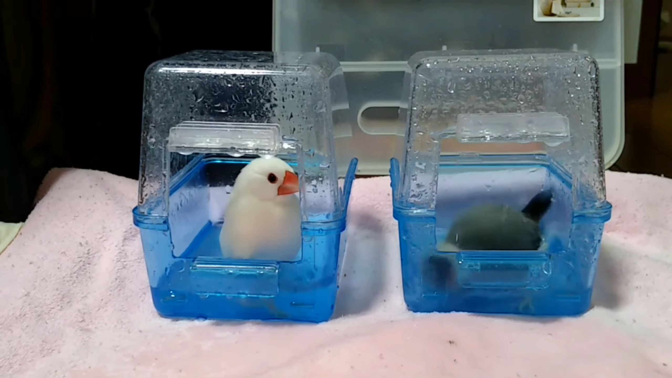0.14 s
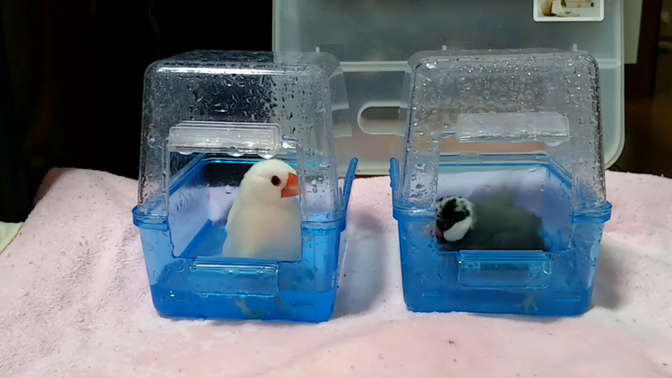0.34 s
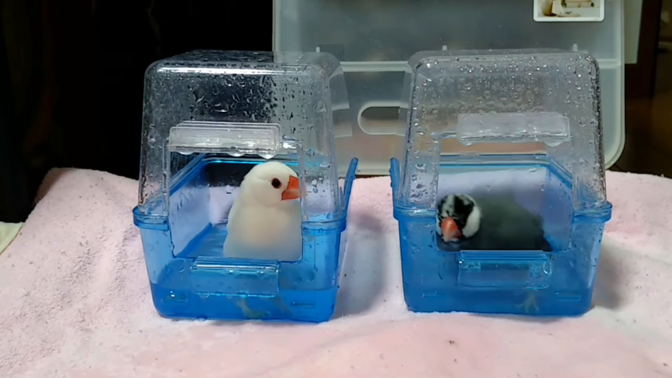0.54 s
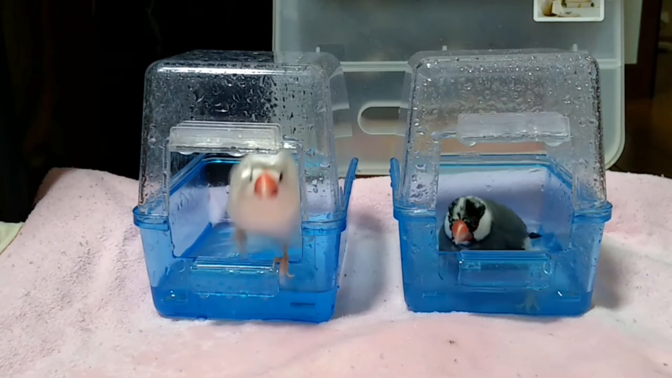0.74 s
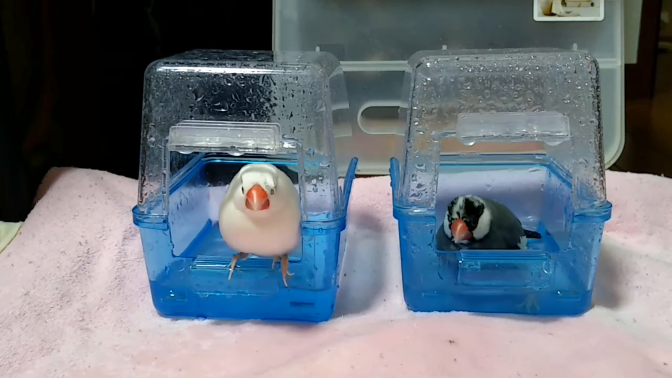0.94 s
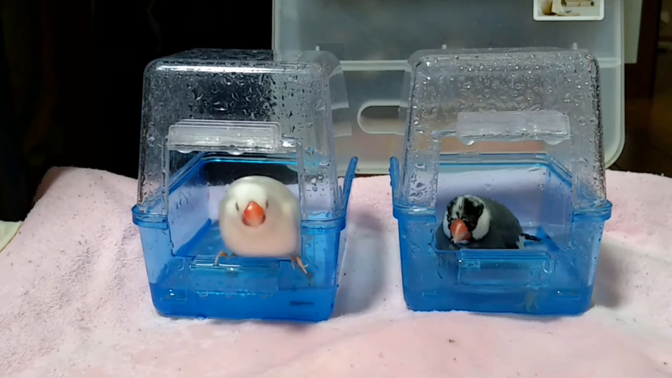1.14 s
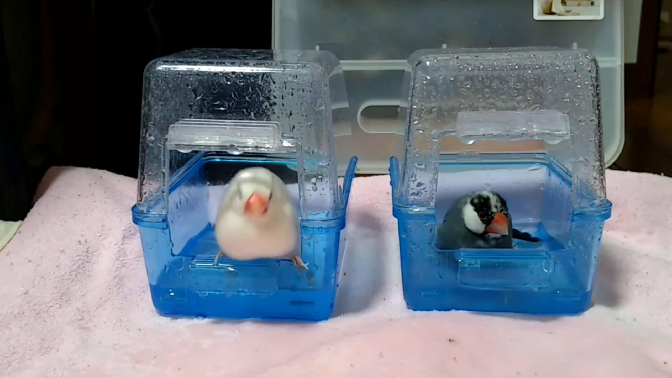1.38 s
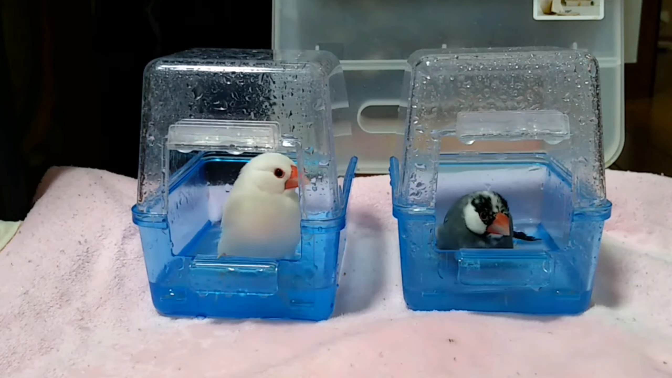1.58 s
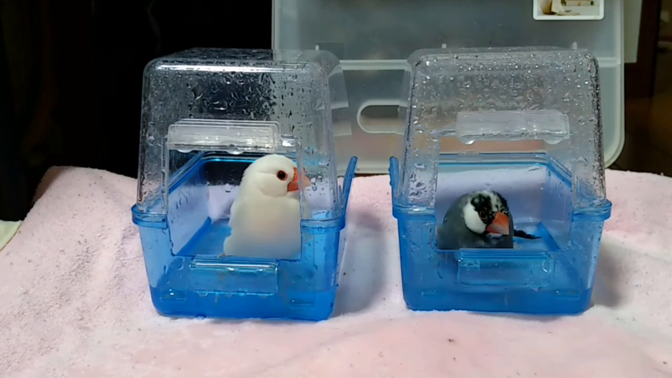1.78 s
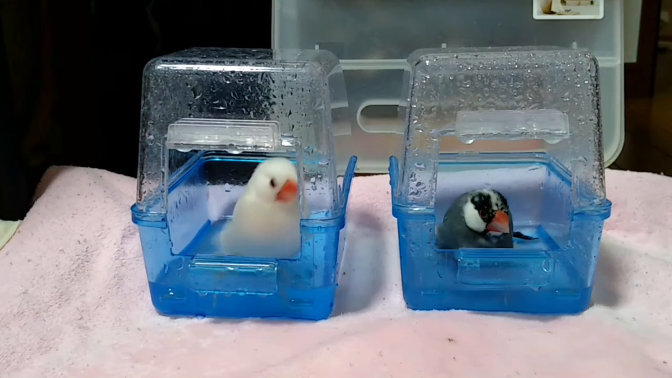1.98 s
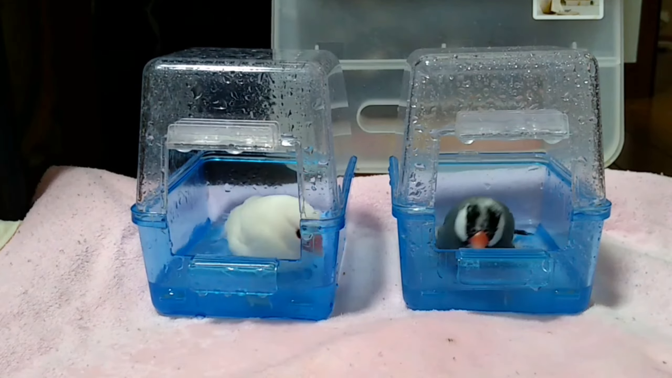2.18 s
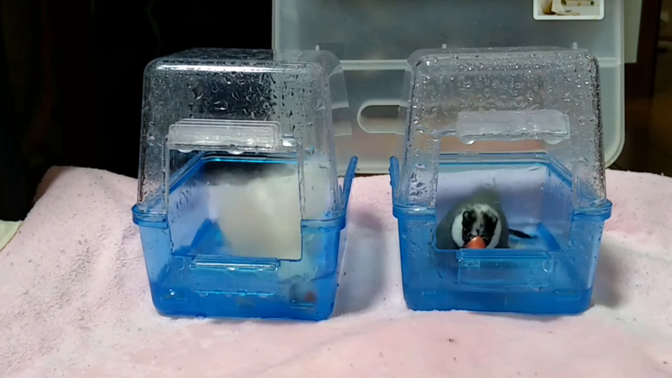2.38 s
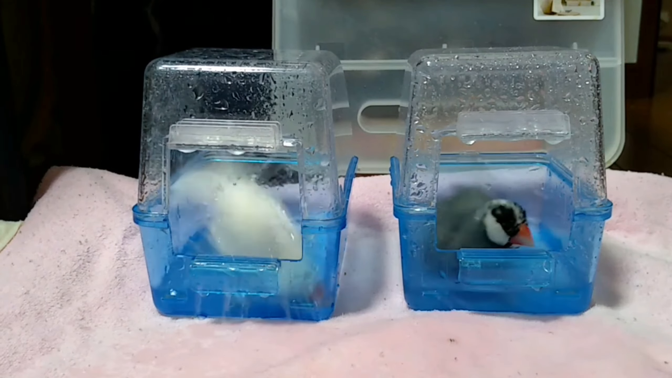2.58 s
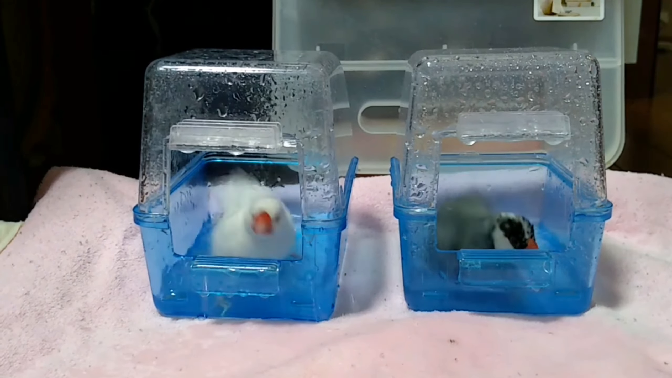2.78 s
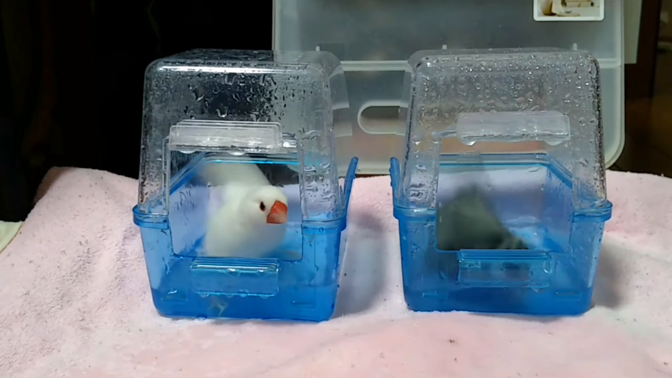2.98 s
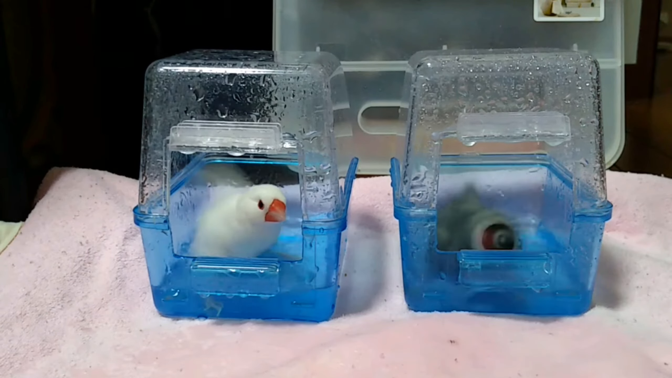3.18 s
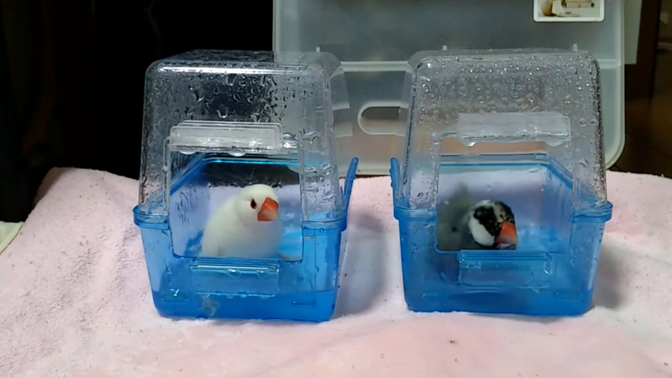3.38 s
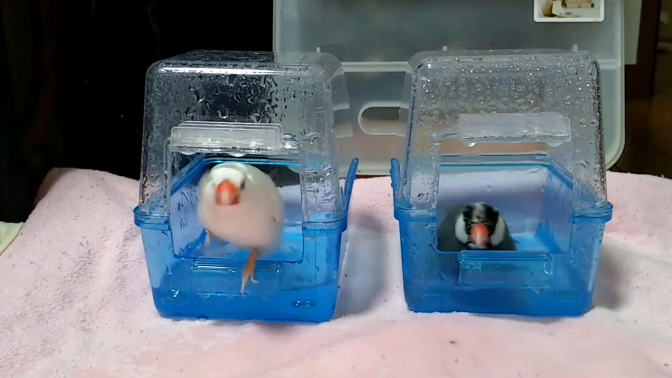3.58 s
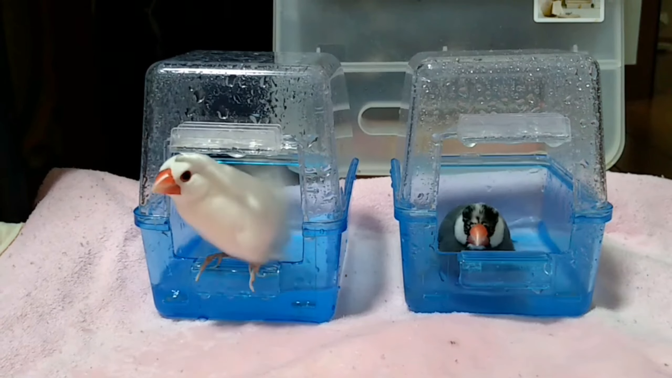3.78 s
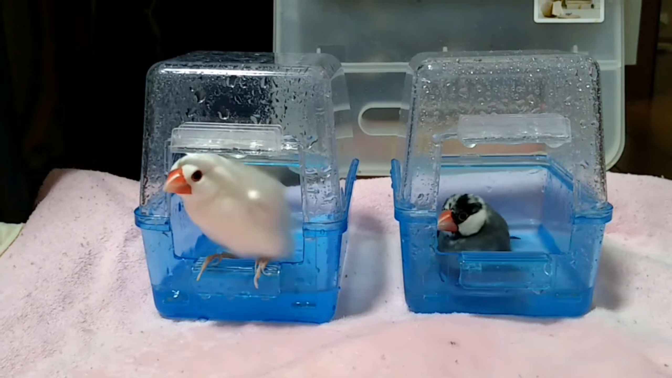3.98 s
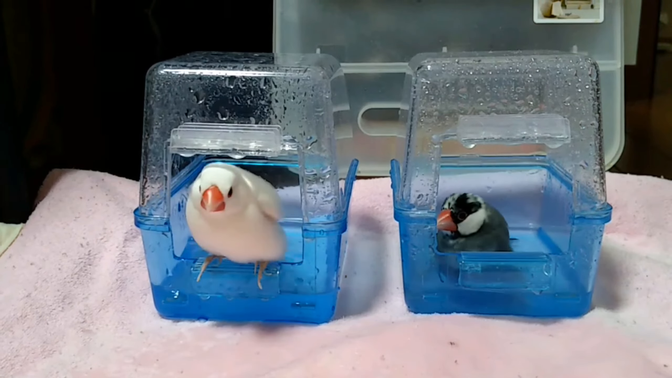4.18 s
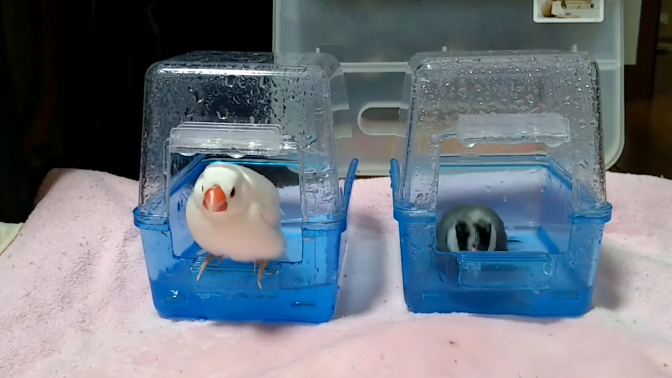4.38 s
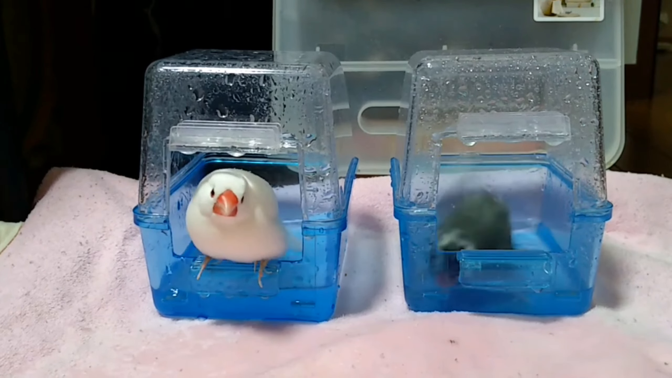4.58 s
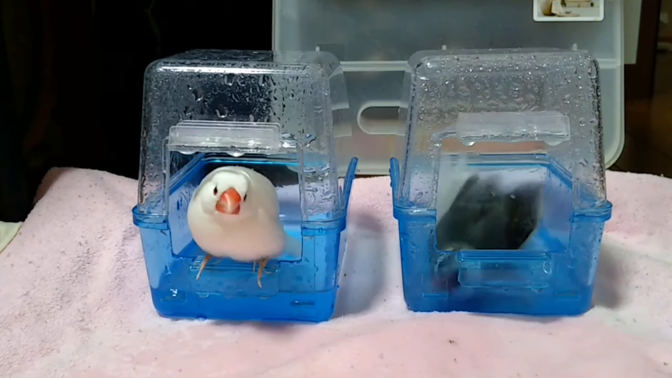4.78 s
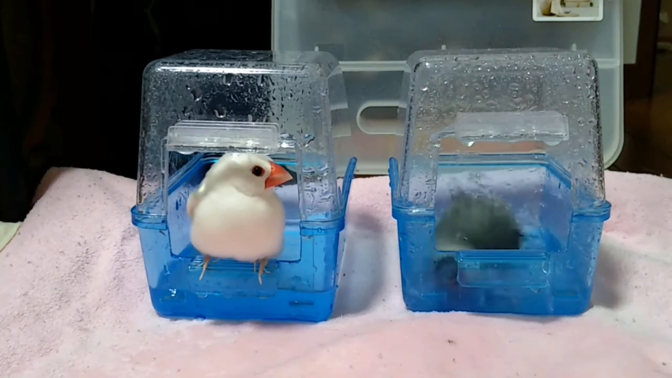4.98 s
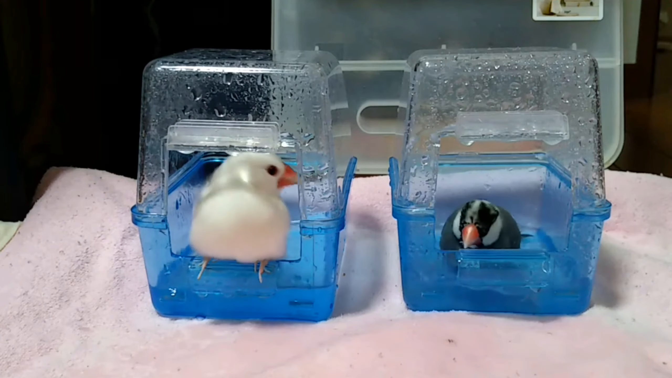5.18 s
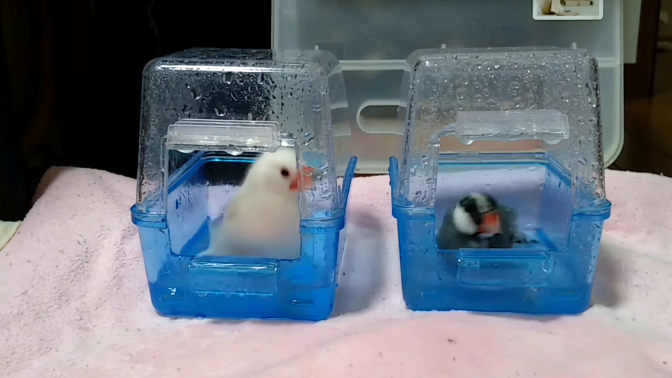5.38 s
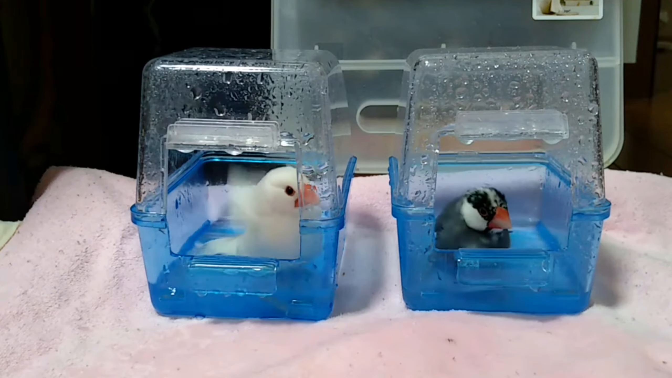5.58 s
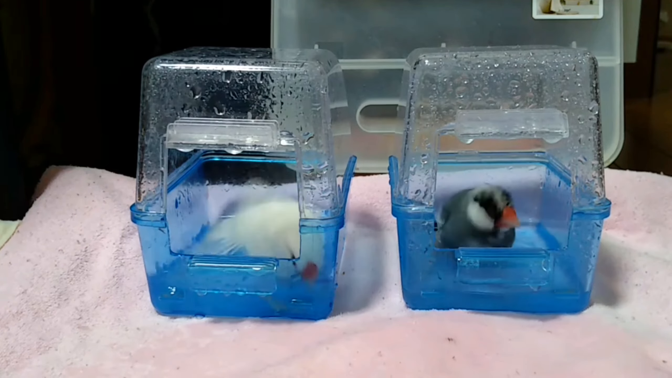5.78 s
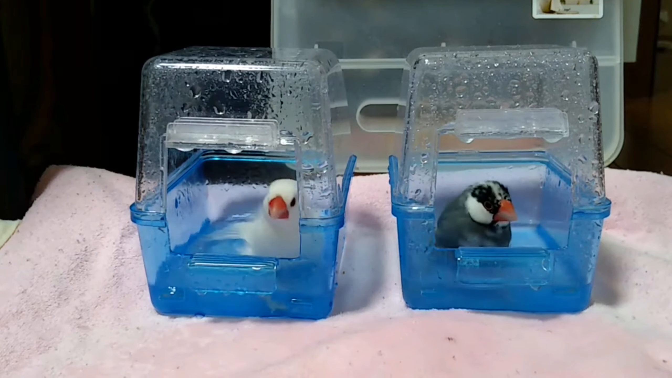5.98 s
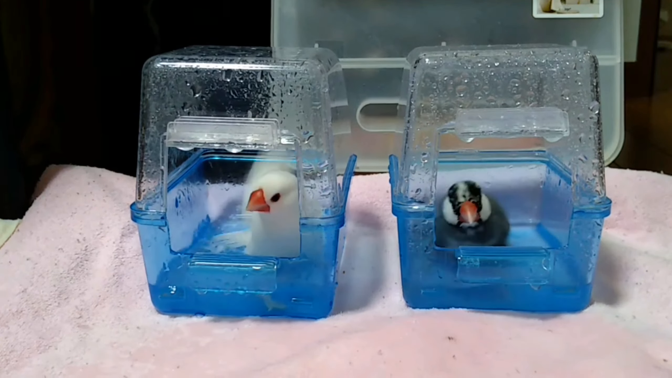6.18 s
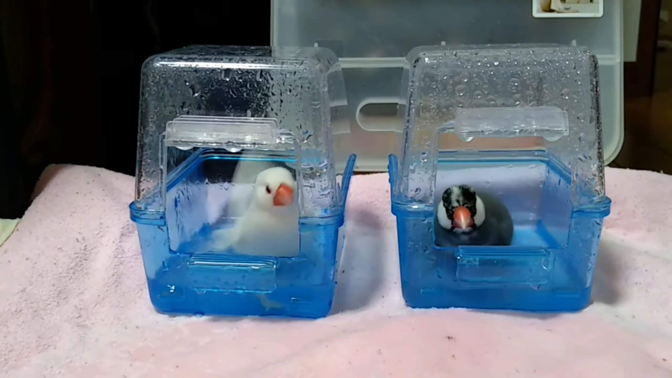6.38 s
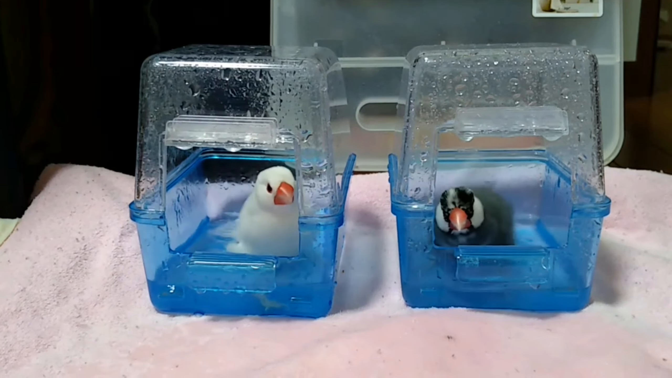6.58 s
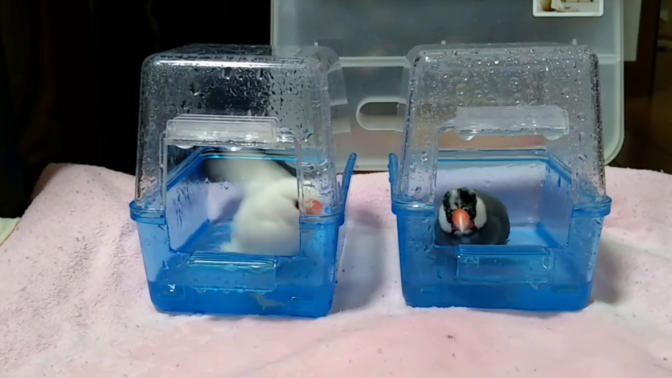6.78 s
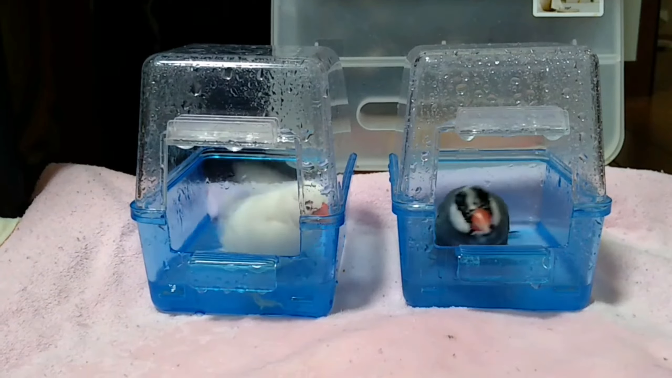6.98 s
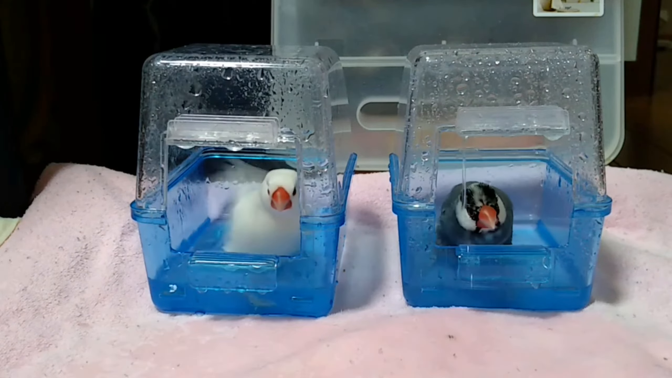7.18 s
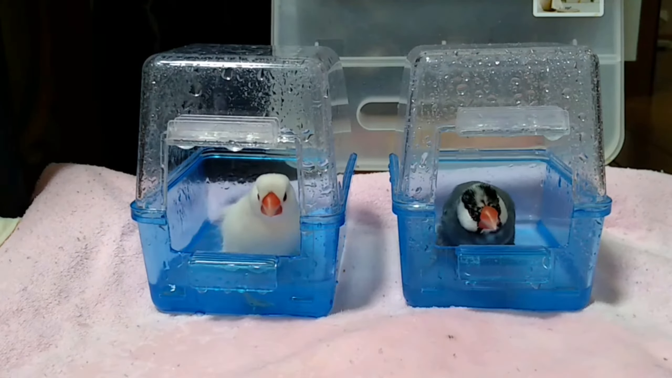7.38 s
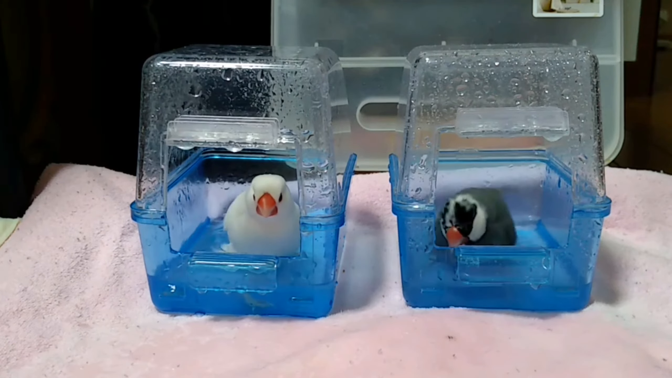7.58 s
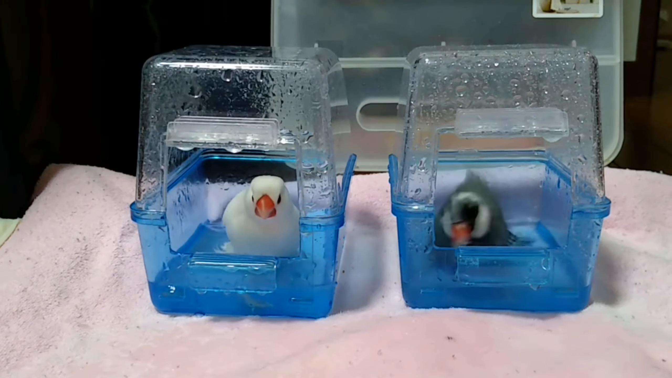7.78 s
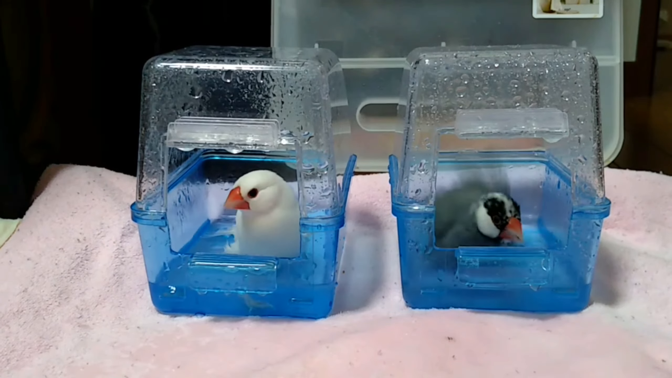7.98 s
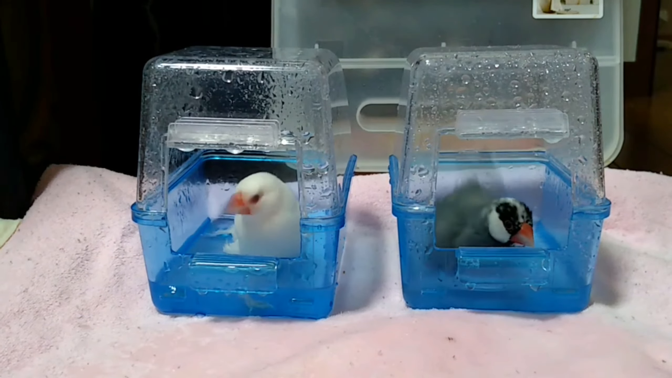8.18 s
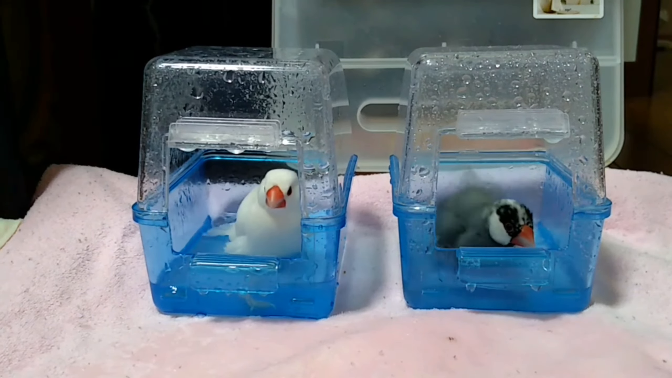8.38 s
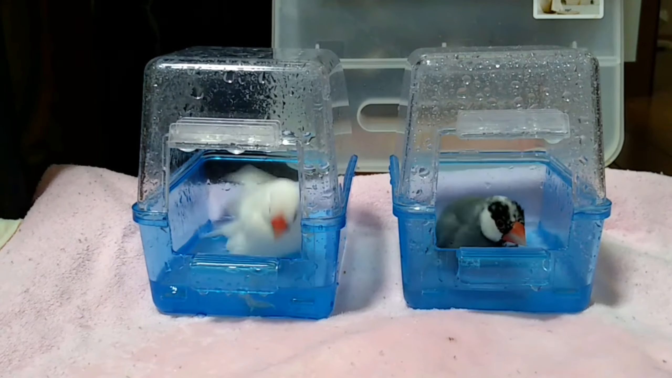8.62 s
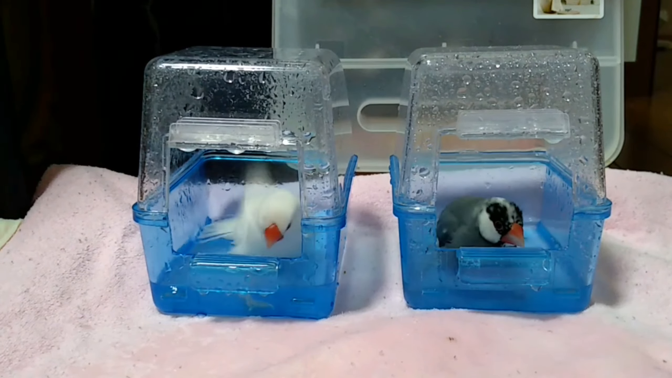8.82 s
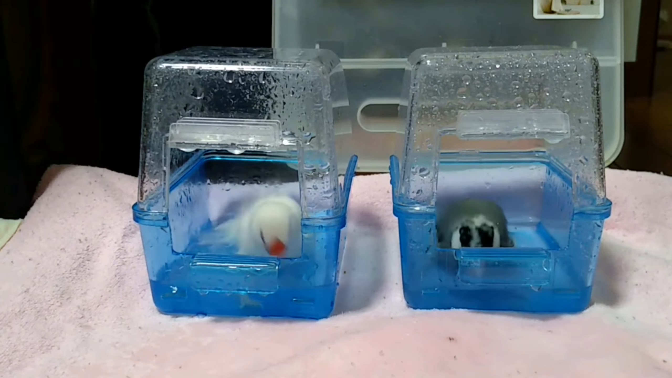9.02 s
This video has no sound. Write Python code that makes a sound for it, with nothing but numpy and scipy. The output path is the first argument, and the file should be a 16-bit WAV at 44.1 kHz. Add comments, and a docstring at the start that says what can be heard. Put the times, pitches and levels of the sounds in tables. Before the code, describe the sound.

Close, fast splashing of little wings in hooded plastic tubs, coming in whirring bursts with short lulls, hollow gulps, wall knocks and tiny rasping calls.

```python
"""Two small birds bathe in hooded plastic baths, heard almost only by the left microphone port.
Wings slap the water about 23 times a second, drops patter on the hoods, beaks and claws knock on the walls, a bird gives three hoarse calls.
The right port hears a faint share of this and low puffs of air."""
import sys
import numpy as np
from scipy import signal
from scipy.fft import rfft, irfft
from scipy.io import wavfile

SR = 44100
rng = np.random.default_rng(int(sys.argv[2]) if len(sys.argv) > 2 else 0)


def put_to_file(sound):
    """Save the sound as 16-bit audio at rate SR, in the file named by the first command-line argument."""
    columns = np.atleast_2d(sound).T  # one column per channel
    safe = np.clip(columns, -1, 1)
    whole_steps = np.round(safe * 32767)
    wavfile.write(sys.argv[1], SR, whole_steps.astype(np.int16))


N = 399105

# wing on water, each slap gulping a pocket of air: (s, spray peak dB, plop dB, gulp dB, gulp pitch Hz)
SLAPS = [(0.0194, -34, -48, -41.5, 326), (0.0762, -32.5, -46.5, -41, 390), (0.1241, -25.5, -63, -52.5, 417),
         (0.168, -33, -56, -48, 357), (0.2074, -45, -59, -47.5, 552), (0.3117, -30.5, -51, -41, 385),
         (0.3466, -35.5, -48, -48, 384), (0.382, -34.5, -57, -39, 247), (0.417, -30.5, -48, -37, 247),
         (0.4554, -28, -46, -37, 257), (0.4943, -30.5, -56, -42.5, 261), (0.5297, -31.5, -36.5, -31, 244),
         (0.5686, -32, -46, -51, 252), (0.6105, -30, -36, -31.5, 394), (0.6544, -36, -51, -40, 240),
         (0.6958, -33, -48, -45, 377), (0.7402, -41.5, -52, -59, 541), (0.7607, -48, -72, -61, 401),
         (0.7946, -54, -74, -62, 374), (0.83, -45.5, -54.5, -43, 334), (0.8669, -48.5, -76, -64, 354),
         (0.9532, -70, -89, -89, 326), (1.0959, -62, -65, -49, 340), (1.1218, -57, -56, -45, 335),
         (1.1298, -36.5, -48, -43.5, 363), (1.3374, -60, -71, -69, 276), (1.4745, -69, -75, -65, 347),
         (1.5349, -45.5, -74, -56, 360), (1.5653, -60, -75, -61, 466), (1.5813, -49, -67, -55, 453),
         (1.6716, -69, -84, -71, 222)] + [(2.0486, -66.5, -69.5, -70, 385), (2.1255, -66, -80, -52, 382), (2.1369, -56, -68, -67, 363),
                         (2.1788, -55, -70, -81, 370), (2.1993, -72, -90, -75, 219), (2.2257, -58.5, -78, -88, 412),
                         (2.323, -62, -72, -71, 383)] + [(2.3728, -33, -41, -44.5, 366), (2.4048, -42, -52.5, -52, 324), (2.4227, -46, -48, -45.5, 310),
                         (2.4681, -46.5, -51, -41.5, 380), (2.5045, -43, -54.5, -44, 347), (2.539, -35.5, -47.5, -42.5, 280),
                         (2.5848, -39, -47.5, -43, 277), (2.6083, -27, -53, -44.5, 332), (2.6592, -30, -49, -40.5, 300),
                         (2.6971, -29.5, -43, -38, 256), (2.7235, -27.5, -42.5, -46.5, 275)] + [(2.772, -30.5, -59, -50, 285), (3.619, -73, -65, -44, 470), (3.68, -61, -67, -39.5, 334), (4.899, -51, -48.5, -37, 940)] + [(2.7818, -31.5, -28.5, -26, 420), (2.8108, -45, -55, -47, 294), (2.8332, -36, -58, -42, 277),
                         (2.8741, -44, -49, -57, 398), (2.8931, -33, -47, -44, 344), (2.9131, -39, -54, -43, 285),
                         (2.935, -25.5, -40, -33, 261), (2.9769, -29, -48.5, -42, 327), (3.0258, -27.5, -43, -32, 262),
                         (3.0622, -26, -53, -33, 283), (3.1001, -29, -54, -32.5, 282), (3.1221, -32, -56, -47, 401),
                         (3.1779, -31, -51, -36, 264), (3.2179, -29.5, -51, -36.5, 262), (3.2563, -32.5, -62, -38.5, 262),
                         (3.2992, -37.5, -45, -34, 273), (3.3321, -21.5, -32, -41.5, 275), (3.3735, -37, -48, -42.5, 265),
                         (3.39, -36, -42, -46, 371), (3.4144, -35.5, -57, -42.5, 350), (3.4418, -42, -49, -52, 342),
                         (3.4563, -35.5, -50, -44, 245), (3.5022, -37.5, -47, -43.5, 259), (3.5346, -47, -53, -51, 301),
                         (3.5516, -42, -55, -65, 283), (3.604, -45.5, -56.5, -50, 382), (3.6534, -53, -64, -53, 308),
                         (3.6918, -45, -53, -43.5, 338), (3.7322, -38, -48.5, -46, 355), (3.7726, -37, -48.5, -43, 324),
                         (3.812, -42, -52, -47.5, 327), (3.8579, -39, -46, -42, 256), (3.8958, -25, -41, -41, 317),
                         (3.9382, -38, -49.5, -49.5, 357), (3.9801, -45, -45, -51, 345), (4.0225, -47.5, -54, -54.5, 346),
                         (4.0704, -56, -61.5, -71, 366), (4.1263, -61, -61.5, -58, 380), (4.1772, -60, -72, -70.5, 372),
                         (4.2261, -64, -70, -77, 369), (4.4037, -75.5, -82, -83, 237), (4.5573, -61.5, -69, -66.5, 516),
                         (4.5623, -59.5, -72, -57.5, 353), (4.6082, -48, -63.5, -50.5, 406), (4.6456, -48, -52.5, -43.5, 338),
                         (4.6556, -34, -57, -43.5, 250), (4.702, -29, -47, -44.5, 246), (4.7534, -31, -51, -57, 417),
                         (4.8142, -39, -60, -54.5, 401), (4.8277, -38, -39, -43, 463), (4.8496, -45, -57, -56, 528),
                         (4.8681, -29.5, -37, -37, 407), (4.9285, -39.5, -59, -49, 404), (4.9519, -39.5, -35.5, -39, 377),
                         (4.9828, -38, -48, -47, 533), (5.0173, -27.5, -36, -33.5, 377), (5.0881, -37, -59, -52.5, 365),
                         (5.1759, -53, -60, -62, 440), (5.2268, -58, -68, -57.5, 263), (5.2777, -59.5, -65, -56, 358),
                         (5.3281, -54, -57.5, -59.5, 353), (5.373, -46.5, -56.5, -51.5, 345), (5.4194, -50, -54, -46, 360),
                         (5.4692, -43.5, -56.5, -50, 350), (5.5321, -55, -65, -55.5, 355), (5.5625, -63, -66, -68, 371),
                         (5.588, -62.5, -65, -56.5, 350), (5.6244, -63.5, -84, -65, 366), (5.6977, -59.5, -65, -59, 357),
                         (5.7461, -37, -47.5, -50, 377), (5.7895, -31, -41, -39.5, 364), (5.8314, -32, -43.5, -43.5, 268),
                         (5.8728, -28.5, -44.5, -43, 355), (5.9172, -29.5, -38.5, -40.5, 252), (5.9636, -37, -46, -49.5, 374),
                         (6.0095, -44.5, -48.5, -51.5, 355), (6.0684, -48, -57, -60, 358), (6.1188, -46, -52.5, -64, 388),
                         (6.1637, -34.5, -46.5, -56, 367), (6.2076, -30.5, -50, -42.5, 345), (6.2275, -35, -51.5, -50, 332),
                         (6.2515, -33.5, -49, -52, 343), (6.2689, -31.5, -55, -50, 396), (6.2954, -33, -46, -46.5, 275),
                         (6.3408, -32, -45, -45.5, 350), (6.3931, -33.5, -56, -52, 396), (6.434, -30, -45, -39.5, 317),
                         (6.4735, -32, -45, -49, 280), (6.5134, -29, -52.5, -47, 260), (6.5548, -35, -55, -46, 261),
                         (6.5957, -31.5, -63, -40.5, 282), (6.6381, -32.5, -43, -40.5, 397), (6.6755, -44, -58, -52, 455),
                         (6.6895, -31.5, -48.5, -53.5, 390), (6.7314, -42.5, -57, -51.5, 388), (6.7618, -48, -61, -84, 409),
                         (6.8107, -43, -62, -80, 275), (6.8606, -38, -57.5, -84, 598), (6.899, -38, -57, -70, 354),
                         (6.9414, -30, -54, -48.5, 290), (6.9823, -31, -50, -47, 343), (7.0237, -31, -49, -43.5, 320),
                         (7.0666, -35.5, -55.5, -43.5, 272), (7.1115, -35.5, -44, -46, 283), (7.1524, -37, -68, -49, 282),
                         (7.1943, -35, -44, -43.5, 287), (7.2397, -31.5, -50, -41.5, 316), (7.2801, -43, -50, -83, 358),
                         (7.3275, -37, -50, -57.5, 273), (7.3754, -38, -58.5, -59, 275), (7.4208, -41.5, -56, -70, 342),
                         (7.4727, -47, -48.5, -53.5, 280), (7.5201, -55, -58, -60, 352), (7.573, -69.5, -78, -72, 361),
                         (7.6303, -61.5, -66, -81, 272), (7.6852, -74, -85, -87, 332), (7.8354, -55, -74.5, -55, 374),
                         (7.8778, -42.5, -46.5, -46.5, 405), (7.9157, -36.5, -43, -44.5, 234), (7.9501, -38.5, -48.5, -45, 390),
                         (7.9845, -34, -47.5, -50, 253), (8.0199, -30, -51, -45, 257), (8.0574, -29.5, -52, -49, 250),
                         (8.0918, -32, -47, -44.5, 250), (8.1277, -24.5, -40.5, -43.5, 250), (8.1666, -32.5, -61, -37.5, 264),
                         (8.2045, -29, -48, -36, 266), (8.2424, -30.5, -42, -37, 252), (8.2814, -37.5, -46, -43, 270),
                         (8.3208, -31, -44, -30.5, 275), (8.3642, -39, -56, -42, 242), (8.4026, -33, -53.5, -38.5, 360),
                         (8.444, -34, -51, -32.5, 355), (8.4899, -39, -55, -56, 410), (8.5263, -39, -54, -51, 375),
                         (8.5792, -44, -55, -65, 348), (8.6415, -51, -72.5, -76, 409), (8.6944, -62.5, -69, -60, 393),
                         (8.8446, -56.5, -66.5, -59.5, 371), (8.8925, -43.5, -55, -56.5, 368), (8.9364, -26, -43.5, -44.5, 370),
                         (8.9758, -25.5, -42, -41, 272), (9.0167, -28.5, -47.5, -49.5, 275)]
# water in the baths: (s, drops on the hood dB, sloshing dB, share of splash in a slap dB)
SPRAY = [(0.0, -53, -71, -2), (0.63, -61, -54.5, 8.5), (0.93, -85, -91, 6), (1.97, -93.5, -88, -19.5),
         (2.42, -74, -92, 0.1), (2.54, -46.5, -44.5, 8), (2.7, -49.5, -52.5, -0.5), (3.12, -54, -51.5, 6.3),
         (3.93, -66.5, -69.5, -1.4), (4.21, -93, -92.5, -8.2), (4.59, -93.5, -85.5, 8.7), (4.76, -59.5, -62, 7),
         (4.91, -58, -57.5, 14.8), (5.14, -75, -84, -2), (5.64, -79.5, -82, -0.7), (6.23, -71, -74, 0.5),
         (6.37, -58.5, -59, 7.2), (6.55, -59, -48.5, 6.2), (6.73, -84, -83.5, 5), (6.93, -89, -79, 3.5),
         (7.13, -70, -63.5, -3.5), (7.66, -96.5, -95, -1.7), (7.89, -92, -80.5, 17), (8.04, -61.5, -51.5, -0.5),
         (8.37, -57.5, -60.5, 4.8), (8.64, -74, -92, 10.7), (8.9, -93, -83, -9), (9.05, -57, -60, -10.5)]
# beak or claw on the wall: (s, peak dB, pitch of the contact Hz, crack dB against the peak)
KNOCKS = [(0.184, -24.5, 2420, -6), (0.534, -33.5, 1320, -12), (2.374, -30.5, 1380, -10), (2.783, -12, 488, -24), (3.078, -25, 2190, -12.5),
          (4.829, -30.5, 460, 2.5), (4.868, -27, 460, 4.5), (4.955, -24, 480, 2), (4.961, -29, 405, 1), (5.017, -20, 2750, 5.5)]
WALL = [(567, -10, 0.097), (976, -15.5, 0.087), (1385, -12.5, 0.02), (2182, 2.5, 0.026), (2720, 1, 0.13),
        (3650, -4, 0.11), (4463, -38.5, 0.034)]   # (Hz, dB, t60 s)
# hoarse calls: (s, pitch Hz, level dB, lower throat tone dB against the pitch)
VOICE = [[(1.853, 1520, -82, -6), (1.859, 2570, -40, 5), (1.866, 4235, -38.5, -14.5), (1.873, 3650, -27, -9.5), (1.883, 3140, -42.5, -12), (1.9, 3520, -47.5, -27.5), (1.94, 3680, -65.5, -6)],
         [(3.109, 2350, -50, -23.5), (3.117, 3080, -37, -19), (3.127, 3570, -27.5, -16.5), (3.142, 3650, -35.5, -6), (3.165, 3600, -53, -20.5), (3.175, 3600, -55, -15)],
         [(3.526, 2090, -44, -14.5), (3.537, 2900, -41.5, -5), (3.545, 3600, -35.5, 0), (3.553, 2900, -52, -10), (3.565, 2600, -54, 0)]]
# air puffs on the right port: (s, peak dB, length s)
PUFFS = [(0.26, -50.5, 0.059), (0.297, -44.5, 0.21), (0.422, -20, 0.021), (0.865, -44.5, 0.019), (1.62, -27.5, 0.036),
         (1.808, -54, 0.053), (1.9, -32.5, 0.027), (4.155, -47, 0.0067), (4.343, -46.5, 0.017), (5.358, -47, 0.015),
         (5.885, -42.5, 0.03), (5.933, -47, 0.038), (6.062, -49, 0.018), (6.57, -45, 0.029), (6.835, -42.5, 0.028),
         (7.287, -50.5, 0.03), (7.411, -47, 0.019), (7.834, -42.5, 0.021), (8.095, -53, 0.064), (8.27, -52, 0.053),
         (8.662, -43, 0.015), (8.842, -38, 0.031), (8.964, -33.5, 0.03)]
# smooth colour of hood and microphone: (Hz, dB)
COLOUR = [(700, 1.5), (1000, -13), (1600, -12), (2500, -12), (4000, -9.5), (5300, -11.5), (7200, -13), (8000, -20.5), (10000, -20.5), (14500, -16), (16000, -56.5)]
# air resonances of the hood and the port: (Hz, width Hz, dB lift)
HOOD = [(1380, 150, 11), (1510, 87, 0.5), (2900, 470, 8), (3600, 280, 6), (4750, 66, 3), (6196, 1025, 13), (6764, 330, 6.5), (8900, 540, 7), (9700, 160, 9)]
# hollow of the bath: (Hz, dB, t60 s)
HOLLOW = [(250, -8, 0.23), (266.9, 2, 0.14), (355, 0, 0.12), (404.3, 1.5, 0.058), (470, -4, 0.063), (550.7, -5.5, 0.08), (640.7, 0, 0.067), (818, -15, 0.16), (926.5, 0, 0.11), (1040, -10, .025)]
LEAK = [(100, -41), (400, -33.5), (700, -29.5), (2300, -18.5), (4000, -27.5), (7000, -42.5), (14000, -42.5)]   # left sound at the right port (Hz, dB)
AIR_LEFT = [(12, -45.5), (20, -10.5), (84, -3.5), (398, -25), (966, -30.5), (1420, -25.5), (2040, -15.5), (6530, -23.5),
            (12000, -14), (15000, -49)]   # (Hz, dB per Hz)
AIR_RIGHT = [(20, -20.5), (45, -6.5), (75, 7.5), (120, -13.5), (180, -18), (400, -25.5), (1500, -31), (5000, -35), (12000, -40), (15000, -43)]   # (Hz, dB per Hz)
AIR_LEFT_DB, AIR_RIGHT_DB = -83, -67.5
ROOM_T60_S, ROOM_DB = 0.2, -10
CUTOFF_HZ = 16300   # fixed
SIZE = 2 ** 19   # fixed
TICKS = [(.442, -12), (2.596, -26), (2.697, -36), (2.728, -38)]   # ticks close to the right port: (s, dB)  # fixed
THROAT_HZ = [2160, 2120, 1750]   # lower tone of each call
FIRM_DB = -32   # fixed
FIRM_LENGTH_S, LENGTH_FOLLOWS = 0.0082, 0.45   # weaker slaps last longer
PEAK_AFTER = 0.17   # lengths from onset to peak
SPLASH_FOLLOWS, SPLASH_VARIES_DB = 1.45, 4.5   # dB per dB of spray; chance from slap to slap
SOFT_BELOW_DB = 11   # this far under a firm slap the plop is only a higher, hollow blip
MIST_SPREAD_DB = 3.5   # fixed
PUFF_HZ, PUFF_HZ_PER_DB = 64.5, 0.51   # at -40.5 dB; harder puffs swing faster
MIST_FOLLOWS = 0.88   # dB per dB of spray
LENGTH_VARIES_DB, RAGGED_S = 2.0, 0.001   # each size of droplet has its own length and moment  # fixed


def amp(db):
    return 10 ** (np.asarray(db) / 20)


def rms_one(x):
    return x / np.sqrt(np.mean(x ** 2) + 1e-20)


def in_time(rows):
    s, *columns = np.transpose(rows)
    return [np.interp(np.arange(N) / SR, s, c) for c in columns]


def colour(x, points, lifts=()):
    """Causal (minimum-phase) filter from a spectrum and a few resonant lifts."""
    hz = np.maximum(np.fft.rfftfreq(SIZE, 1 / SR), 1)
    db = np.interp(np.log(hz), np.log(np.array(points)[:, 0]), np.array(points)[:, 1])
    for top_hz, width_hz, lift_db in lifts:
        db = db + lift_db / (1 + (2 * (hz - top_hz) / width_hz) ** 2)
    cepstrum = irfft(db * np.log(10) / 20)
    cepstrum[1:SIZE // 2] *= 2
    cepstrum[SIZE // 2 + 1:] = 0
    return irfft(rfft(x, SIZE) * np.exp(rfft(cepstrum)))[:N]


def band(x, low_hz, high_hz):
    return signal.sosfilt(signal.butter(2, [low_hz, high_hz], "band", fs=SR, output="sos"), x + 1e-18)


def ring(clicks, hz, t60):
    """A unit click sets a sine of height 1 ringing."""
    r, w = amp(-60 / (max(t60, .003) * SR)), 2 * np.pi * hz / SR
    return signal.lfilter([0, np.sin(w)], [1, -2 * r * np.cos(w), r * r], clicks + 1e-18)


def drift(rate):
    """Low-passed chance of spread 1, wandering at the given rate."""
    r = np.exp(-2 * np.pi * rate / SR)
    return rms_one(signal.lfilter([1], [1, -2 * r, r * r], rng.standard_normal(N + SR))[SR:])


def grains(per_s, spread_db):
    """Random clicks of uneven size, rms 1."""
    sizes = amp(spread_db * np.minimum(rng.exponential(1, N), 5)) * rng.choice([-1, 1], N)
    return rms_one(sizes * (rng.random(N) < per_s / SR))


def bursts(levels_db, rise, fall):
    """Every slap swells to its peak and dies away, both in proportion to its length."""
    out, t = np.zeros(N + SR), np.arange(-SR // 20, SR // 10) / SR
    for row, db, (vary, late) in zip(SLAPS, levels_db, rng.standard_normal((len(SLAPS), 2))):
        length = np.clip(FIRM_LENGTH_S * amp(LENGTH_FOLLOWS * (FIRM_DB - row[1]) + LENGTH_VARIES_DB * vary), .002, .03)
        i = round((row[0] + PEAK_AFTER * length + RAGGED_S * late) * SR)
        out[i:i + len(t)] += amp(db) * np.where(t < 0, np.exp(-(t / (rise * length)) ** 2), np.exp(-t / (fall * length)))
    return out[SR // 20:][:N]


def hollow(push):
    """The air and walls of the bath ring in a few low modes, neighbours of opposite sign."""
    return sum((-1) ** k * amp(db) * ring(push, hz, t60) for k, (hz, db, t60) in enumerate(HOLLOW))


def water():
    """Slaps are bursts of droplets of three sizes; loose drops and sloshing fill the gaps."""
    _, spray_db, plop_db, _, _ = np.transpose(SLAPS)
    drops_db, slosh_db, share_db = in_time(SPRAY)
    soft = np.clip((FIRM_DB - spray_db) / SOFT_BELOW_DB, .01, .9)   # fixed
    splash_db = SPLASH_FOLLOWS * (spray_db - FIRM_DB) + SPLASH_VARIES_DB * rng.standard_normal(len(SLAPS))
    spray = droplets(bursts(spray_db + 15.5, 0.24, 0.42), 4850, 7670, 9000, 15.0)
    mist = band(grains(14000, MIST_SPREAD_DB) * bursts(MIST_FOLLOWS * (spray_db - FIRM_DB) - 25, 0.25, 0.8), 8800, 12000)   # too fine to ring
    splash = droplets(amp(share_db) * bursts(splash_db - 23, 0.13, 0.67), 1785, 4960, 2500, 23.0)
    plop = droplets(bursts(plop_db + 29 + 10 * np.log10(1 - soft), 0.23, 0.45), 1000, 2270, 1800, 17.0)
    blip = droplets(bursts(plop_db + 27 + 10 * np.log10(soft), 0.25, 0.14), 1483, 1800, 2500, 14.0, count=4)
    drops = droplets(amp(drops_db + 22 + 2.0 * drift(25)), 700, 15000, 3300, 9.3, count=20)
    slosh = amp(slosh_db - 28 + 7.1 * drift(45)) * band(rng.standard_normal(N), 240, 640)
    gurgle = droplets(amp(slosh_db + 2.5 + 3.0 * drift(12)), 600, 1900, 120, 16.0)   # bubbles burst here and there
    swell = band(rng.standard_normal(N) * bursts(spray_db + 0.3, 0.44, 1.0), 17, 150)   # the wing pushes air at the port
    return colour(mist + spray + splash + plop + blip + drops + gurgle, COLOUR, HOOD) + band(hollow(slosh) + gulps(), 250, 3000) + swell


def knocks():
    """A contact pulse and a rattle that dies away strike the wall modes; a soft contact leaves the high ones alone."""
    out, t = np.zeros(N + SR), np.arange(SR // 8) / SR
    chance = rng.normal(0, 3, (len(KNOCKS), len(WALL)))   # fixed
    for (s, db, hz, crack_db), vary_db in zip(KNOCKS, chance):
        shape = np.sin(2 * np.pi * hz * t) * amp(-60 * t * hz / 12)
        shape += band(rng.standard_normal(len(t)) * amp(-7 - 60 * t / 0.052), 0.32 * hz, 1.6 * hz)
        shape += band(rng.standard_normal(len(t)) * amp(crack_db - 60 * t / 0.024), 1700, 3100)
        for (mode_hz, mode_db, t60), v in zip(WALL, vary_db):
            reach = 1 / (1 + (mode_hz / (0.87 * hz)) ** 4)
            shape += reach * amp(mode_db + v - 8.5 - 60 * t / min(t60, .06)) * np.sin(2 * np.pi * mode_hz * t)
        i = round(s * SR)
        out[i:i + len(t)] += amp(db + 6.0) * shape
    return band(out[:N], 340, 9000)


def calls():
    """A rough tone inside a breathy band that follows the pitch, with a little of its octave and a lower steady throat tone."""
    out, t = np.zeros(N), np.arange(N) / SR
    waver, flutter = 0.01 * drift(300), amp(1.93 * drift(200))
    breath = rms_one(band(rng.standard_normal(N), 52, 600))
    hiss = rms_one(band(rng.standard_normal(N), 3100, 5200))
    for rows, throat_hz in zip(VOICE, THROAT_HZ):
        hz, db, throat_db = in_time(rows)
        turn = 2 * np.pi * np.cumsum(hz * (1 + waver)) / SR
        tone = (flutter + 0.54 * breath) * (np.sin(turn) + 0.048 * np.sin(2 * turn))
        throat = amp(throat_db) * (0.99 * flutter + 0.42 * breath) * np.sin(2 * np.pi * throat_hz * t)
        out += (tone + throat + 0.35 * hiss) * amp(db) * ((t > rows[0][0]) & (t < rows[-1][0]))
    return band(band(out, 1400, 7800), 1400, 7800)


def puffs():
    """Each puff swings the membrane a few times, falling in pitch, and stops."""
    out, ticks = np.zeros(N + SR), np.zeros(N)
    for s, db, length in PUFFS:
        t = np.arange(0, 1.5 * length, 1 / SR)
        turn = 2 * np.pi * (PUFF_HZ + PUFF_HZ_PER_DB * (db + 40.5)) * (t + 0.0029 * (1 - np.exp(-t / 0.004)))
        swing = np.sin(np.pi * (t / (1.5 * length)) ** 0.32) ** 0.63
        i = round(s * SR)
        out[i:i + len(t)] -= amp(db) * swing * np.sin(turn)
    for s, db in TICKS:
        ticks[round(s * SR)] = amp(db)
    return band(out[:N], 28, 320) + band(ticks, 1300, 4000)


def room(x):
    """A short dull tail of dying noise."""
    t = np.arange(SR // 2) / SR
    tail = rng.standard_normal(len(t)) * amp(-60 * t / ROOM_T60_S) * (t > .004)
    tail = band(tail / np.sqrt(np.sum(tail ** 2)), 210, 6300)
    return irfft(rfft(x, SIZE) * rfft(tail, SIZE))[:N]


def gulps():
    """A pocket of air rings briefly, rising in pitch, and sets the nearest modes of the hollow going."""
    out, t = np.zeros(N + SR), np.arange(SR // 8) / SR
    hollow_hz, hollow_db, t60 = np.transpose(HOLLOW)[:, :, None]
    chance = rng.standard_normal((len(SLAPS), 2, len(HOLLOW), 1))
    for (s, _, _, db, hz), (vary, turn) in zip(SLAPS, chance):
        pocket = np.sin(2 * np.pi * hz * t * (1 + 3.1 * t)) * amp(-60 * t * hz / 15)
        reach_db = -12 * np.abs(np.log2(hollow_hz / hz))
        modes = amp(hollow_db + reach_db + 2.04 * vary - 5 - 60 * t / t60) * np.sin(2 * np.pi * hollow_hz * t + 1.87 * turn)
        i = round(s * SR)
        out[i:i + len(t)] += amp(db + 10) * (pocket + modes.sum(axis=0)) * (1 - np.exp(-(t / 0.0024) ** 2))
    return out[:N]


def droplets(strength, low_hz, high_hz, per_s, cycles, count=14):
    """Each droplet rings a few cycles at a pitch of its own, so every slap has other peaks."""
    clicks, dealt = strength * grains(per_s, 3.32), rng.integers(0, count, N)
    pitches = np.geomspace(low_hz, high_hz, count)
    rings = sum(np.sqrt(hz / (cycles * SR)) * ring(clicks * (dealt == k), hz, cycles / hz) for k, hz in enumerate(pitches))
    edges = 0.5 * low_hz, min(1.49 * high_hz, .45 * SR)
    return band(band(rings, *edges), *edges)


def scene():
    splashes, blows, voice = water(), knocks(), calls()
    left = splashes + blows + voice + amp(ROOM_DB) * room(splashes + blows + amp(2.5) * voice)
    through = amp(-7.5) * splashes + blows   # blows travel through the table, the splashes only through the air
    right = colour(through + 0.26 * room(through), LEAK) + puffs()
    air_left = amp(AIR_LEFT_DB) * rms_one(colour(rng.standard_normal(N), AIR_LEFT))
    air_right = amp(AIR_RIGHT_DB + 2.5 * drift(2.7)) * rms_one(colour(rng.standard_normal(N), AIR_RIGHT[:5] + [(400, -68.5)]))
    hiss_right = amp(AIR_RIGHT_DB - 9.5) * rms_one(colour(rng.standard_normal(N), AIR_RIGHT[4:]))
    return np.array([left + air_left, right + air_right + hiss_right])


def record(dry):
    """The top is cut."""
    return signal.sosfilt(signal.cheby2(20, 70, CUTOFF_HZ, fs=SR, output="sos"), dry)


dry = scene()
out = record(dry)
put_to_file(out)
```